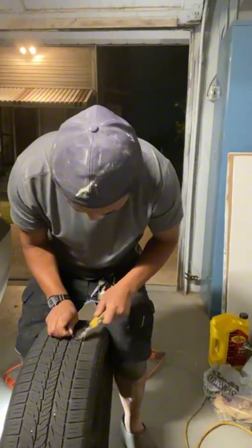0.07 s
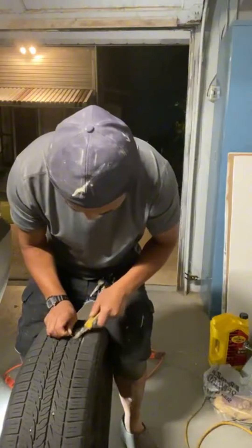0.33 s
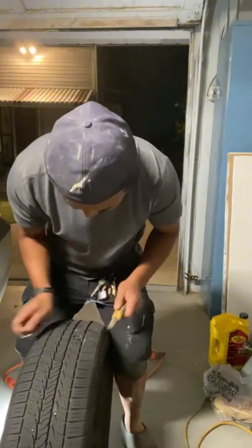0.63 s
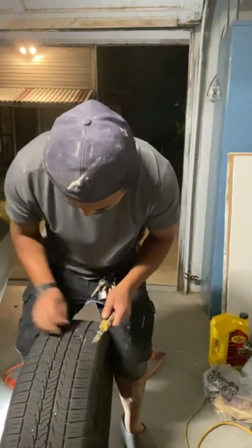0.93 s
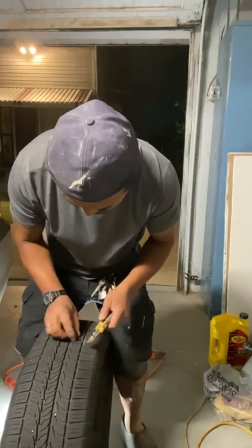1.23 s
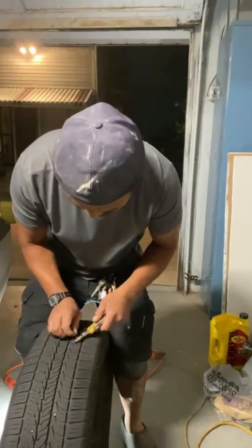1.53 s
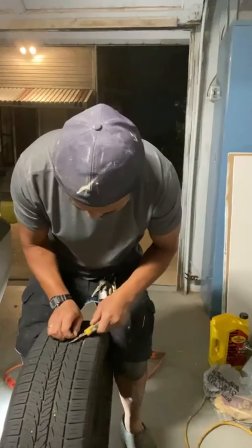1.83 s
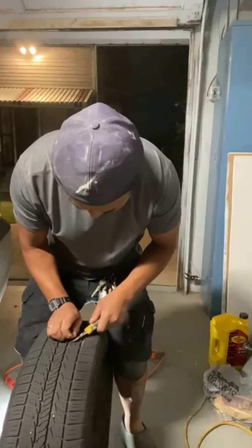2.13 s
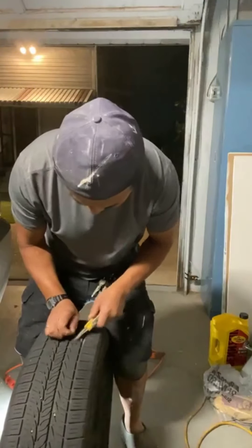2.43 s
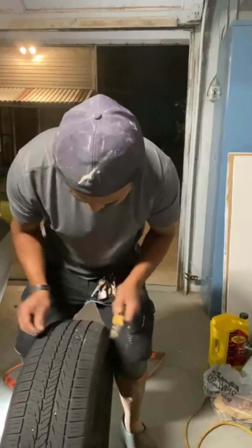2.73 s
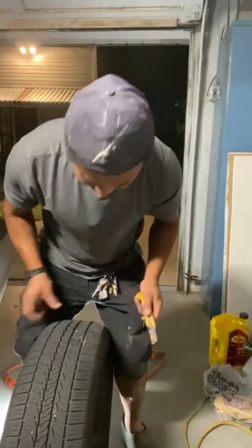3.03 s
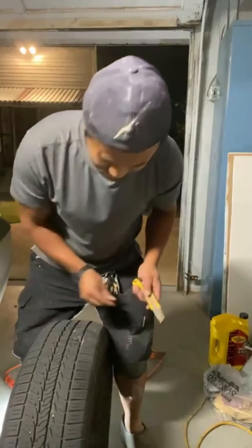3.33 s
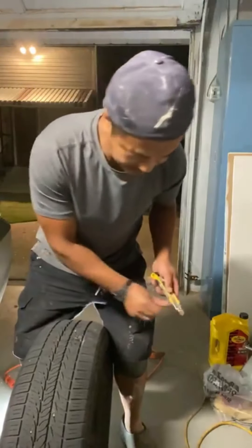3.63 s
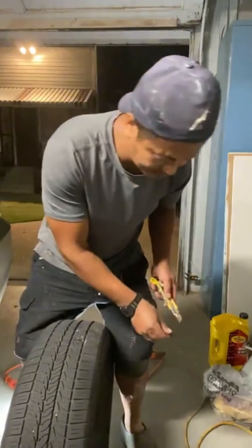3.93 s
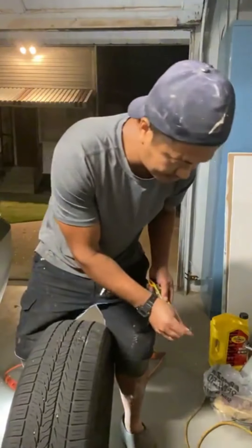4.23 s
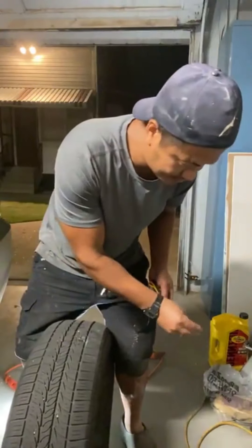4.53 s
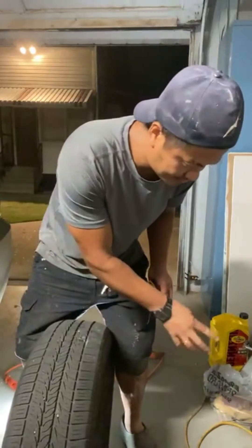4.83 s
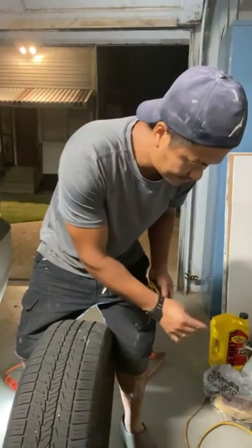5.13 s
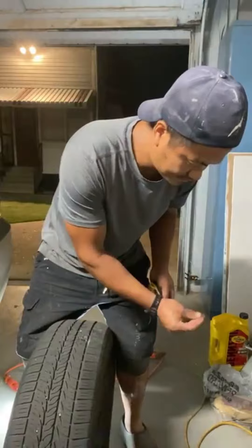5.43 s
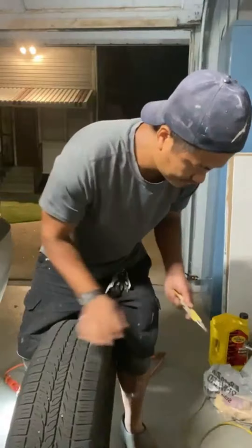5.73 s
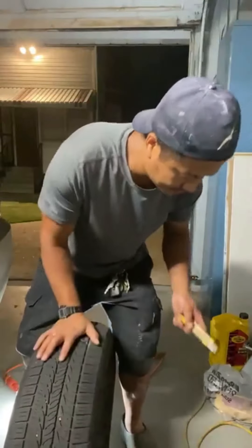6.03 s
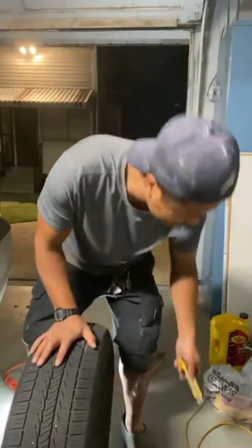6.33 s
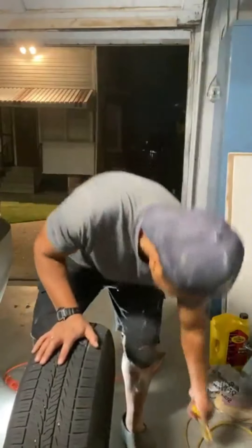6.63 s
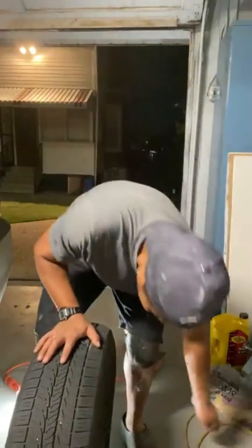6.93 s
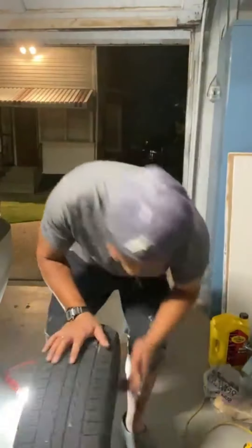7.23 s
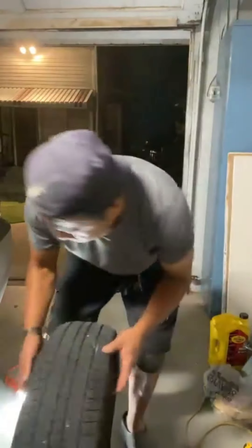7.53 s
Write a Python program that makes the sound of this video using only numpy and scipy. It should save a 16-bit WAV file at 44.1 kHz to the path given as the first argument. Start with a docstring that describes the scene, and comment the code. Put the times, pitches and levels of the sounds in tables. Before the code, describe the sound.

Steel pliers work at a tire close by, in a bare garage with a short echo. Light ticks and gritty scrapes open the scene, with one sharp snap at about 0.6 seconds as the jaws slip off the tread. After sparse ticks, more snaps come at 2.5 and 2.7 seconds, each with a faint dull rubber knock, then brighter ones at 3.3 and 3.6. A lull follows, with only soft brushes of fingers and cloth. From 6 to 6.3 seconds the jaws click shut in a quick, thin, metallic run. At about 7.1 seconds the pliers land on concrete in a short ringing clatter, the loudest sound, followed by one small tick. Faint town noise, a low throbbing engine and trilling insects lie underneath throughout, and a distant car swells and fades around 3 seconds.

```python
"""Steel pliers pick at a tyre in an open garage at night: the jaws slip off the tread and snap shut,
are clicked a few times in the hand, then clatter onto the concrete floor. Each blow is a burst of
tiny impacts that rings the steel, damped in the hand and freer on the floor; the bare room answers.
Outside, a passing car swells and fades over town noise, a throbbing engine and insects."""
import sys
import numpy as np
from scipy import signal
from scipy.fft import rfft, irfft
from scipy.io import wavfile
from scipy.ndimage import uniform_filter1d, minimum_filter1d

SR = 44100
rng = np.random.default_rng(int(sys.argv[2]) if len(sys.argv) > 2 else 0)


def int16_out(signal):
    """Quantize to a 16-bit WAV file."""
    q = np.round(np.clip(np.atleast_2d(signal).T, -1, 1) * 32767)
    wavfile.write(sys.argv[1], SR, q.astype(np.int16))


N = 343098
T = np.arange(N) / SR
HIT_T = T[:2 * SR // 5]  # the 0.4 s that one blow lasts


def undb(db):
    """Decibels to gain."""
    return 10 ** (np.asarray(db) / 20)


def on_log(points, hz):
    """Read (pitch_hz, value) points on a log-frequency axis."""
    point_hz, value = np.transpose(points)
    return np.interp(np.log(np.maximum(hz, 1)), np.log(point_hz), value)


def colour(x, points):
    """Minimum-phase EQ through (pitch_hz, gain_db) points."""
    size = 4096
    gain = undb(on_log(points, np.fft.rfftfreq(size, 1 / SR)))
    cepstrum = irfft(np.log(gain))
    cepstrum[1:size // 2] *= 2
    cepstrum[size // 2 + 1:] = 0
    return signal.fftconvolve(x, irfft(np.exp(rfft(cepstrum))))[:len(x)]


def band(x, hz, width_hz):
    """One resonance, gain 1 at its centre."""
    return signal.lfilter(*signal.iirpeak(hz, hz / width_hz, SR), x)


def steep_band(x, hz, width_hz):
    """The same resonance twice, for steeper skirts."""
    return band(band(x, hz, width_hz), hz, width_hz)


def unit(x):
    """Scale to rms 1."""
    return x / np.std(x)


def blow(x):
    """Scale a hit to the energy of one millisecond at full level."""
    return x * np.sqrt(SR / 1000 / np.sum(x ** 2))


def noise(points):
    """Steady coloured noise of rms 1."""
    return unit(colour(rng.standard_normal(N), points))


def drift(rate_hz):
    """Smooth random wander with a spread near 1."""
    return np.interp(T * rate_hz, np.arange(N), rng.standard_normal(N))


def add(out, start_s, x):
    """Mix x into out from start_s."""
    i = max(int(start_s * SR), 0)
    out[i:i + len(x)] += x[:len(out) - i]


def contact(decay_s):
    """Rough faces meeting: a dying burst of tiny impacts."""
    return np.sign(rng.random(len(HIT_T)) - .5) * np.exp(-np.minimum(HIT_T / decay_s, 20))


def hard_contact(decay_s):
    """A contact so hard that it carries every pitch about equally."""
    burst, size = contact(decay_s), 1024
    power = uniform_filter1d(np.abs(rfft(burst[:size])) ** 2, size=13)
    flattening_eq = np.c_[np.fft.rfftfreq(size, 1 / SR) + 1, -10 * np.log10(power)]
    return colour(burst, flattening_eq)


# tone of the distant town: pitch_hz, gain_db
TOWN_EQ = [(25, -28), (45, -9), (66, -3.5), (120, 0.5), (200, -6.5), (400, -7.5), (800, -5.5), (1100, -7),
           (1500, -10.5), (2500, -20), (4500, -27), (7800, -32.5), (10500, -40.5), (14000, -49),
           (16000, -48)]
def town():
    """A steady bed of far town noise with a faint flutter."""
    return noise(TOWN_EQ) * undb(-53.74 + 0.16 * drift(15))


# tone of the engine rumble: pitch_hz, gain_db
ENGINE_EQ = [(35, -38), (55, -2), (75, -6), (98, -7.5), (130, -2.5), (190, -16), (400, -48)]
# its level ride: time_s, level_db
ENGINE_RIDE = [(0, -64), (2.2, -62), (3.3, -56.5), (4.6, -74), (5.3, -71), (6.2, -59.5), (7.6, -54)]
def engine():
    """A low engine rumbles; a narrow band of noise makes it throb unevenly."""
    throb = unit(steep_band(rng.standard_normal(N), hz=81.2, width_hz=13))
    ride_db = np.interp(T, *np.transpose(ENGINE_RIDE))
    return unit(noise(ENGINE_EQ) + undb(-2) * throb) * undb(ride_db)


def nearness(nearest_s, speed_m_s=21, road_m=8.6):
    """Least distance of the car over its present distance."""
    return road_m / np.hypot(road_m, speed_m_s * (T - nearest_s))


# low roar of the car: pitch_hz, gain_db
CAR_EQ = [(30, -21.5), (60, -6), (150, 2), (280, 7.5), (500, -2.5), (1000, -5), (2500, -38.5)]
# hiss of its tyres: pitch_hz, gain_db
TYRE_EQ = [(300, -20.5), (600, -5), (900, 2), (1200, -4), (1700, -14), (2500, -13.5), (6000, -28.5)]
def passing_car(nearest_s=3):
    """The roar follows distance; tyre hiss beams along the road, so it peaks later and fades slower."""
    roar = noise(CAR_EQ) * undb(-54) * nearness(nearest_s)
    hiss = noise(TYRE_EQ) * undb(-54.5) * nearness(nearest_s + .2) ** 0.75
    return roar + hiss


def insects():
    """A far chorus trills steadily; one insect rasps a short run of very high pulses."""
    chorus = unit(steep_band(rng.standard_normal(N), hz=5500, width_hz=550))
    start_s, stop_s, period_s = 3.74, 4.47, .122
    pulses = np.sin(np.pi * (T - start_s) / period_s) ** 4 * (T > start_s) * (T < stop_s)
    rasp = noise([(9000, -27), (12000, -3), (15000, 3)])
    return chorus * undb(-72 + 0.5 * drift(25)) + rasp * pulses * undb(-65.5)


# reverb time of the bare room: pitch_hz, t60_s
GARAGE_DECAY = [(500, 0.45), (2500, 0.42), (5000, 0.45), (8000, 0.32), (15000, 0.34)]
# tone of its reflections: pitch_hz, gain_db
GARAGE_EQ = [(2500, -0.5), (8000, -0.5), (11000, -2), (16000, -7.5)]
def garage(dry, room_db):
    """Near surfaces scatter the sound at once; the tail follows and loses its treble first."""
    onset = np.clip((HIT_T - .003) / .0008, 0, 1)  # 3 ms of pre-delay
    early = onset * contact(decay_s=0.01)  # the tool keeps moving, so each call draws new reflections
    hz, time_s, cells = signal.stft(rng.standard_normal(len(HIT_T)), SR, nperseg=512)
    decay = np.exp(-np.log(1000) * time_s / on_log(GARAGE_DECAY, hz)[:, None])
    tail = onset * signal.istft(cells * decay, SR)[1][:len(HIT_T)]
    response = colour(unit(early) + undb(-1) * unit(tail), GARAGE_EQ) / np.sqrt(len(HIT_T))
    return dry + undb(room_db) * signal.fftconvolve(dry, response)[:len(dry)]


def rubs(strokes, eq, grain_db):
    """Sliding contact in grainy swells of noise."""
    swell = sum(undb(db) * np.exp(-(2 * (T - peak_s) / length_s) ** 2) for peak_s, length_s, db in strokes)
    return swell * unit(noise(eq) * undb(grain_db * drift(300)))


# brushes of fingers and cloth: peak_s, length_s, level_db
BRUSH_STROKES = [(1.22, 0.12, -62.5), (1.289, 0.025, -53), (2.38, 0.064, -63), (2.645, 0.05, -55),
                 (3.0, 0.092, -62), (3.128, 0.029, -49), (4.507, 0.035, -60.5), (4.83, 0.069, -65),
                 (5.216, 0.032, -64), (5.662, 0.033, -57)]
# their airy tone: pitch_hz, gain_db
BRUSH_EQ = [(2000, -24), (4000, -9), (8500, -4), (11000, -2), (15500, 0.5)]
def brushes():
    """Fingers and cloth brush lightly over the tool."""
    return rubs(BRUSH_STROKES, BRUSH_EQ, grain_db=6)


# scrapes of steel and handle sleeves: peak_s, length_s, level_db
SCRAPE_STROKES = [(.02, 0.064, -53), (.096, 0.017, -48.5), (.55, 0.11, -57), (3.275, 0.063, -49),
                  (4.95, 0.4, -69), (6.88, 1, -66)]
# their gritty tone: pitch_hz, gain_db
SCRAPE_EQ = [(1200, -25.5), (2500, -1), (4500, -4.5), (8000, -7), (11000, -14.5), (15500, -16)]
def scrapes():
    """Steel and sleeves scrape, and the jaws slide into every snap; a grip draws the slide out."""
    lead_s, free_s, grip_s = 0.0079, 0.015, 0.03
    slides = [(snap_s - lead_s, free_s + grip * grip_s, db - 34.5) for snap_s, db, grip, _, _ in SNAP_HITS]
    return rubs(list(SCRAPE_STROKES) + slides, SCRAPE_EQ, grain_db=6.5)


# tread rubber springing back: start_s, level_db
TREAD_PLUCKS = [(.566, -41.5), (.711, -39.5), (2.535, -42), (2.706, -35)]
def tread():
    """Plucked rubber answers with a short dull knock."""
    out = np.zeros(N)
    for start_s, level_db in TREAD_PLUCKS:
        knock = steep_band(contact(decay_s=0.0065), hz=647, width_hz=160)
        add(out, start_s, undb(level_db) * blow(knock))
    return out


# free ringing modes of the pliers: pitch_hz, level_db, t60_s
STEEL_MODES = [(2030, -6, .15), (2191, -5, .2), (2693, -8, .32), (3038, -3, .28), (3546, -5, .25),
               (3932, -6, .25), (4134, -1, .27), (4700, -2, .25), (4787, -2, .27), (5079, 1, .26),
               (5399, -4, .25), (6332, -2, .2), (6953, -5, .2), (7430, -2, .2), (7753, -3, .18),
               (9534, -11, .18)]
def steel_ring(scatter_db):
    """One decaying sine for each mode; every blow weights the modes differently."""
    pitch_hz, level_db, t60_s = np.transpose(STEEL_MODES)[:, :, None]
    modes = undb(level_db) * np.sin(2 * np.pi * pitch_hz * HIT_T) * np.exp(-np.log(1000) * HIT_T / t60_s)
    weights = undb(scatter_db * rng.standard_normal(len(modes))) * rng.choice([-1, 1], len(modes))
    return blow(weights @ modes)


# pliers landing on concrete: start_s, level_db, decay_s, softness_db
FLOOR_HITS = [(7.0865, -16, 0.018, -4.5), (7.104, -3.5, 0.0022, -0.5), (7.1075, -5.5, 0.0013, 0),
              (7.1086, -2, 0.0021, -4), (7.1125, -15.5, 0.0035, 6), (7.1170, -7.5, 0.0051, -10.5),
              (7.130, -23, .005, -2), (7.2036, -15.5, 0.0032, 5), (7.221, -19, 0.045, 2.5)]
# tone of the clack: pitch_hz, gain_db
CLACK_EQ = [(210, -82.5), (350, -41.5), (817, -17.5), (1120, -17), (2030, -9), (2840, -5), (4040, -4.5),
            (4450, -5), (4900, -1.5), (5840, -7), (7790, -5.5), (8440, -13.5), (9900, -16), (16000, -32.5)]
def floor_clatter():
    """One handle touches, the head slaps down and chatters, then the other handle drops."""
    out = np.zeros(N)
    for start_s, level_db, decay_s, softness_db in FLOOR_HITS:
        clack = garage(blow(colour(hard_contact(decay_s), CLACK_EQ)), room_db=-5.5)
        ring = undb(-7.5) * steel_ring(scatter_db=3)
        # a sleeved handle lands more softly than bare steel, so it sounds duller
        tone = [(500, -0.5), (1400, softness_db + 2.5), (5000, 0.55), (14000, -softness_db)]
        add(out, start_s, undb(level_db) * blow(colour(clack + ring, tone)))
    return out


def grip_eq(grip, treble_db):
    """Free jaws sound thin; a grip on rubber adds body and knock and cushions the highest treble."""
    body_db = -9.5 + grip * 11.5
    knock_db = body_db + grip * 6.5
    return [(600, knock_db - 9), (1400, knock_db - 3), (2400, knock_db - 1.5), (3500, body_db),
            (6000, 0), (8500, 0), (12000, treble_db), (16000, treble_db - grip * 15)]


# broad resonances of the hand-held jaws: pitch_hz, width_hz, gain_db
JAW_BANDS = [(1480, 460, -9), (2450, 560, 2.5), (3050, 350, 5), (3760, 600, 6), (4940, 1370, 3),
             (6100, 2260, 1), (7320, 400, 4), (7630, 650, -1), (9700, 360, -1.5), (13780, 4900, -8.5)]
def jaw_click(grip, treble_db, pitch_hz, decay_s, rebound_s, ring_db, accent_db, accent_width_hz, room_db):
    """Steel meets steel, rebounds and meets again; the hand damps nearly all of the ring."""
    # strike and rebound each get their own reflections, so the tail sounds noisy rather than pitched
    strike, rebound = (garage(hard_contact(decay_s), room_db) for _ in range(2))
    rebound_db = 0.5 - 7 * grip  # rubber damps the rebound; grip runs from 0 (free) to 1 (full)
    add(strike, rebound_s * rng.uniform(.8, 1.2), undb(rebound_db) * rebound)
    body = sum((-1) ** k * undb(gain_db) * band(strike, hz, width_hz)
               for k, (hz, width_hz, gain_db) in enumerate(JAW_BANDS))
    accent = undb(accent_db) * band(body, pitch_hz, accent_width_hz)  # the contact point favours one pitch
    click = blow(body + accent) + undb(ring_db) * steel_ring(scatter_db=6)
    return blow(colour(click, grip_eq(grip, treble_db)))


# light ticks of the pliers: start_s, level_db, grip, treble_db, pitch_hz
TICK_HITS = [(0.3398, -37.5, 0.67, -3, 2300), (0.4107, -41, 0.56, -8, 3800), (0.523, -39, 0.7, -2, 2700),
             (0.6161, -28.5, 0.5, 3, 3070), (0.7103, -39, 0.47, 2, 2100), (0.874, -49, .9, 1, 4200),
             (1.67, -40, 0.57, -2, 2210), (1.8239, -36, 1, -3, 4360), (1.8832, -39.5, 1, -7, 2450),
             (2.5141, -33.5, 1, -7, 2300), (2.6477, -33, 0.57, 1, 5000), (2.918, -45, 1, -6, 3820),
             (3.2523, -36.5, 0.3, -6, 6000), (3.5562, -31.5, 0.9, -1, 4320), (3.568, -32.5, 0.9, -8, 4430),
             (5.8637, -47.5, 0.9, -8, 4300), (6.013, -22, 0.54, 4, 5530), (6.0165, -21, 0.65, -1, 2350),
             (6.2708, -28.5, 0.57, -5, 2980), (7.7713, -40.5, 0.93, -2, 4050)]
def ticks():
    """The loose joint rattles and the tips touch the tread: lighter, looser contacts."""
    out = np.zeros(N)
    for start_s, level_db, grip, treble_db, pitch_hz in TICK_HITS:
        tick = jaw_click(grip, treble_db, pitch_hz, decay_s=0.0015, rebound_s=.0025,
                         ring_db=-21, accent_db=5.5, accent_width_hz=320, room_db=-5.5)
        add(out, start_s, undb(level_db) * tick)
    return out


# jaws snapping shut: start_s, level_db, grip, treble_db, pitch_hz
SNAP_HITS = [(0.5644, -20.5, 1, -1, 3020), (2.534, -18.5, 0.87, -1, 3000), (2.7045, -16, 0.56, 2.5, 2500),
             (3.3494, -11.5, 0.26, 0, 7950), (3.5840, -21.5, 0.14, 6, 4230), (6.0190, -18, 0.04, 0, 6730),
             (6.0898, -15.5, 0, -1.5, 6330), (6.1510, -15, 0.03, 1.5, 6300), (6.181, -14.5, .15, 0, 7200),
             (6.323, -19, .3, 7.5, 4120)]
def snaps():
    """The jaws close hard and briefly, off the tread or free in the hand."""
    out = np.zeros(N)
    for start_s, level_db, grip, treble_db, pitch_hz in SNAP_HITS:
        snap = jaw_click(grip, treble_db, pitch_hz, decay_s=0.001, rebound_s=.0017,
                         ring_db=-16.5, accent_db=4, accent_width_hz=230, room_db=-7.5)
        add(out, start_s, undb(level_db) * snap)
    return out


def scene():
    """The pliers sound in the garage, with the night coming through the open door."""
    handling = garage(brushes() + scrapes() + tread(), room_db=-5)
    blows = snaps() + ticks() + floor_clatter()
    outside = town() + engine() + passing_car() + insects()
    return (outside + handling + blows)[None]


def record(dry):
    """A limiter ducks the loudest peaks for a few milliseconds; a steep low-pass cuts the top."""
    ceiling, window, top_hz = .8, SR // 500, 15900
    gain = ceiling / np.maximum(np.abs(dry), ceiling)
    smooth_gain = uniform_filter1d(minimum_filter1d(gain, window), window)
    low_pass = signal.ellip(10, .2, 70, top_hz, fs=SR, output="sos")
    return signal.sosfilt(low_pass, dry * smooth_gain)


dry = scene()
out = record(dry)
int16_out(out)
```